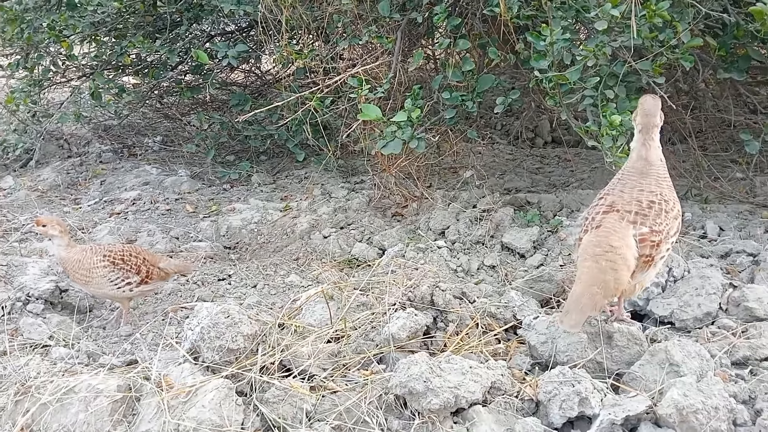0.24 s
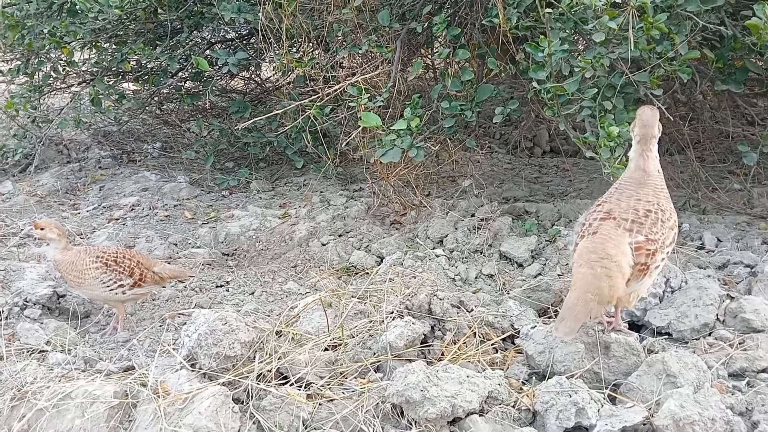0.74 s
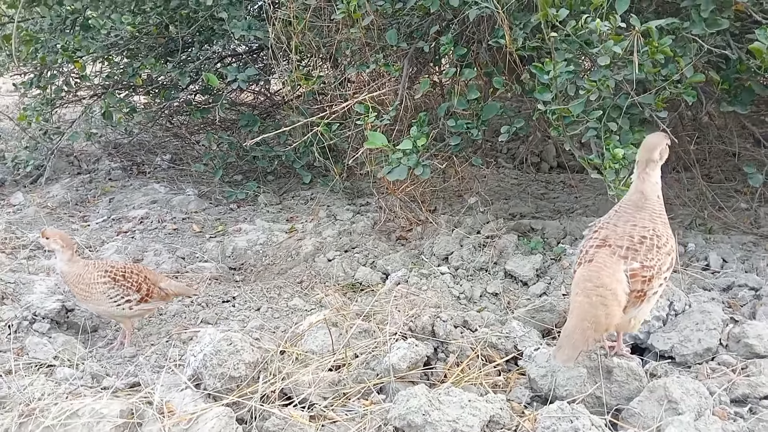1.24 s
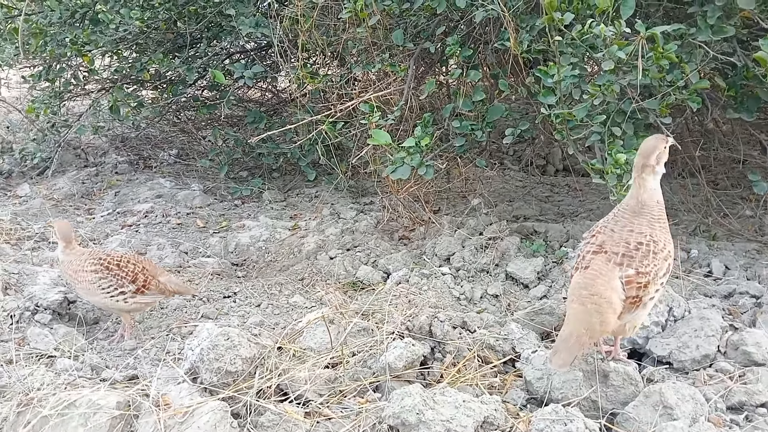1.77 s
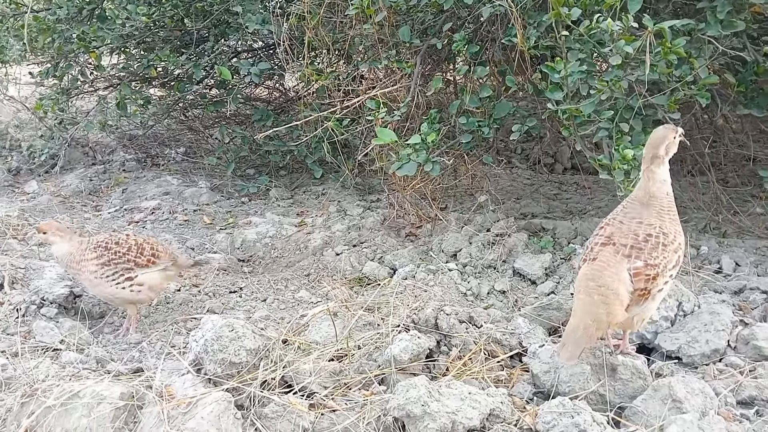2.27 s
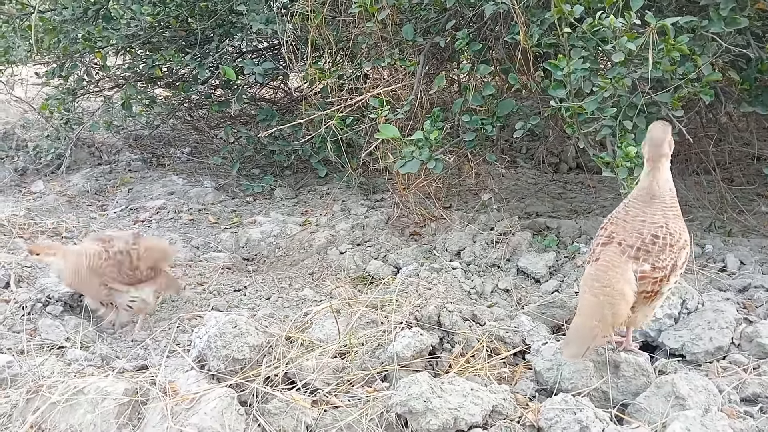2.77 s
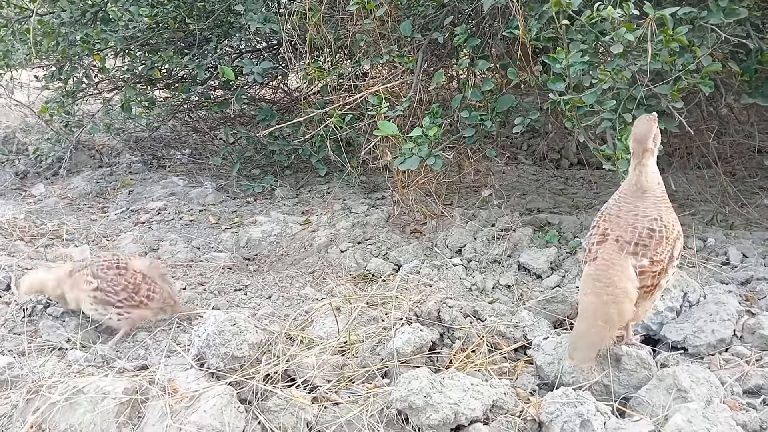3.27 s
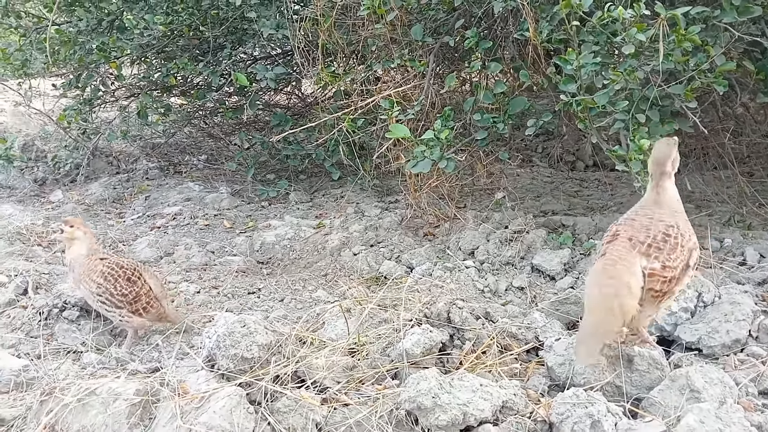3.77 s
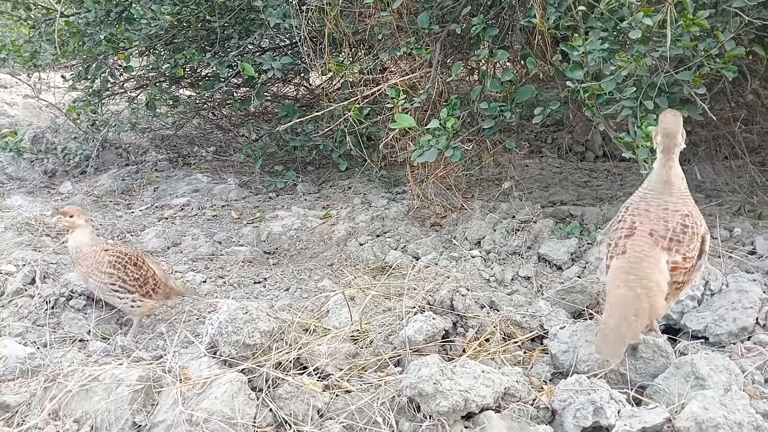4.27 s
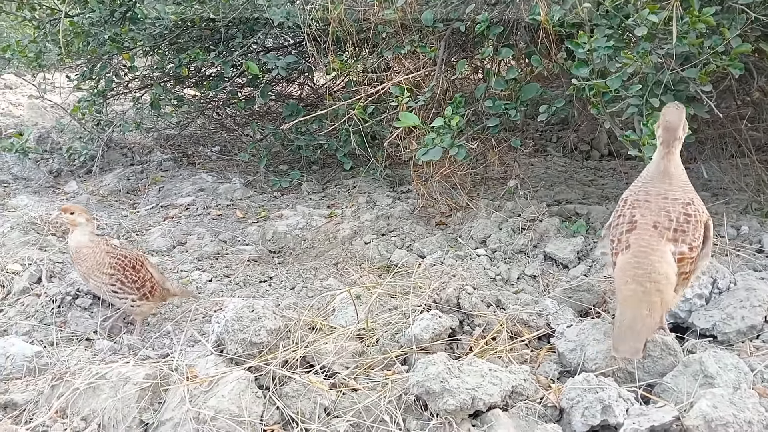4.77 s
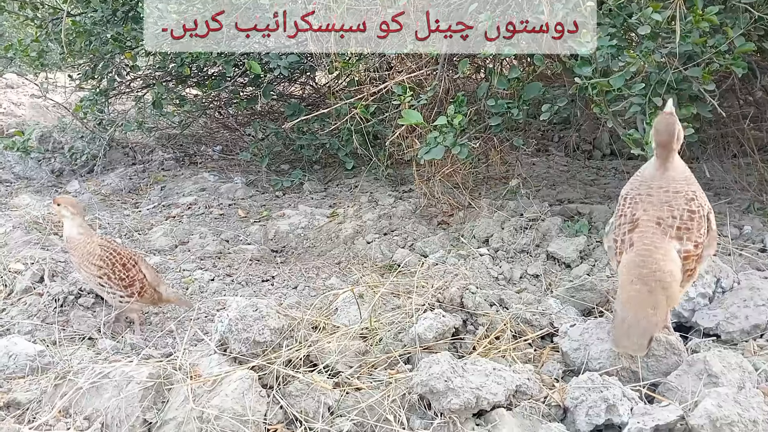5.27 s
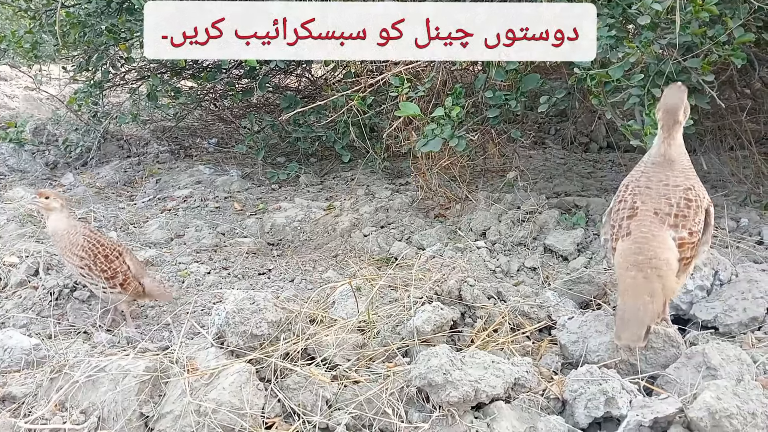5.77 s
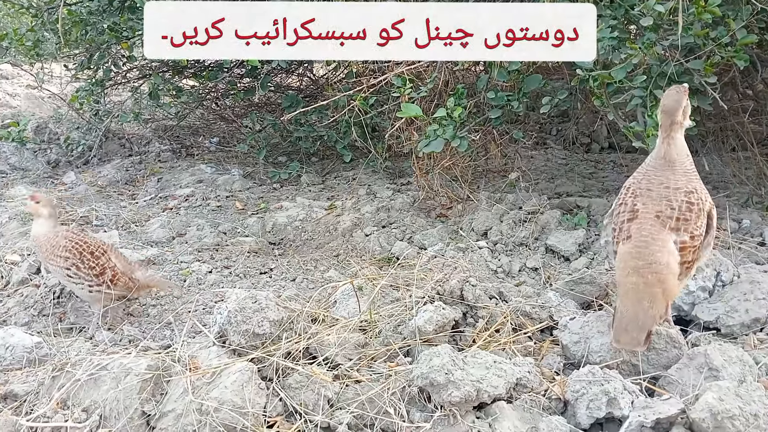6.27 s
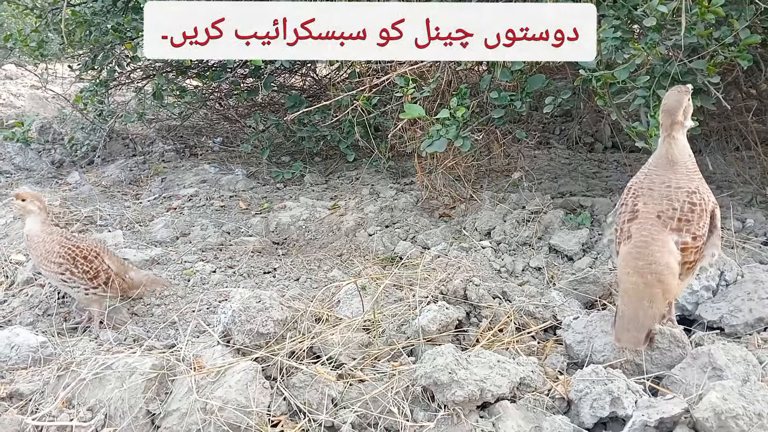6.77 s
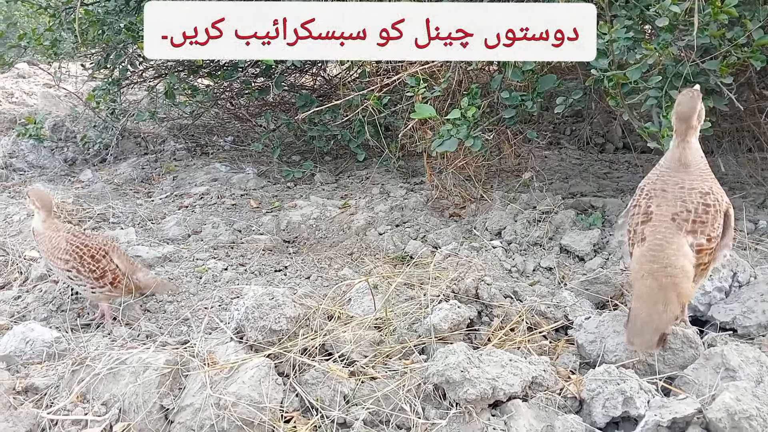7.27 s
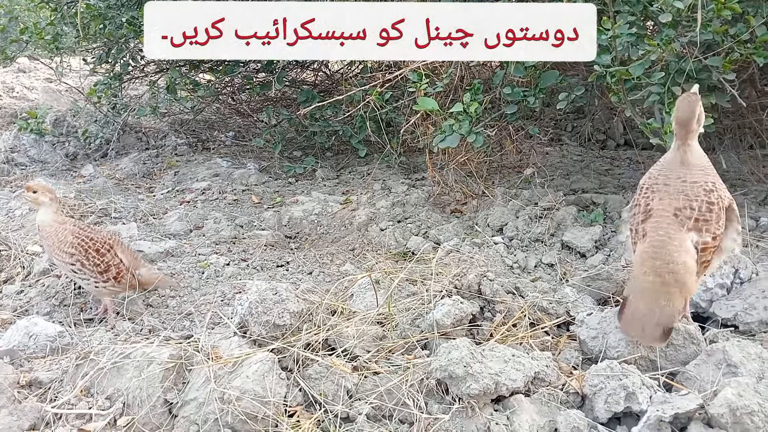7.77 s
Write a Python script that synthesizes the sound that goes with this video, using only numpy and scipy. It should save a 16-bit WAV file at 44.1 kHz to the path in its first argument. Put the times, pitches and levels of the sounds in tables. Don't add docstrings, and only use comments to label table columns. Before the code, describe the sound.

After a quiet windy lull, a close partridge gives one opening note, then harsh two-part screeches, clucks and whistles in steady repetition outdoors.

```python
import sys
import numpy as np
from scipy import signal
from scipy.fft import rfft, irfft
from scipy.io import wavfile
from scipy.ndimage import uniform_filter1d

SR = 44100
rng = np.random.default_rng(int(sys.argv[2]) if len(sys.argv) > 2 else 0)


def unload_wav(signal):
    wavfile.write(
        sys.argv[1],
        SR,
        np.round(np.clip(np.atleast_2d(signal).T, -1, 1) * 32767).astype(np.int16),
    )


def voltage_ratio(level):
    return 10 ** (np.asarray(level, float) / 20)


N = 353682

# start, level tone onset and falling tone onset in seconds, pitch in Hz, half-pitch in dB.
SCREECHES = [(2.387, 2.425, 2.494, 2083, 9), (2.966, 3.004, 3.070, 2087, 7.5),
             (3.569, 3.604, 3.674, 2103, 5.5), (3.941, 3.983, 4.044, 2141, 2.5),
             (4.618, 4.658, 4.721, 2110, 2.5), (5.309, 5.346, 5.415, 2103, 3),
             (5.908, 5.945, 6.012, 2106, 4.5), (6.506, 6.549, 6.616, 2088, 3),
             (7.12, 7.159, 7.229, 2093, 5), (7.726, 7.765, 7.833, 2087, 5)]
# head turn 0-1, half-pitch delay in seconds, falling half-pitch in dB, effort in dB.
SCREECH_MANNERS = [(.1, 0.011, -6.5, -0.1), (.1, 0.00064, -8.5, -0.5), (.1, 0.00089, -8, 1),
                   (.2, 0.0011, -8.5, -1), (.8, 0.0061, -7.5, 1), (.9, 0.0015, -7.5, .5),
                   (.9, .016, -8.5, 0), (.95, .001, -6, -0.1), (.9, 0.00065, -15.5, -1),
                   (.95, .001, -8.5, -.5)]
# start and tone onset in seconds, rasp in dB, tone in dB, pitch in Hz.
FULL_CLUCKS = [(2.653, 2.686, -17.5, -16.5, 1515), (2.772, 2.798, -19.5, -17, 1455),
               (3.24, 3.268, -16.5, -15, 1640), (3.356, 3.384, -15.5, -10, 1580),
               (4.204, 4.231, -14.5, -13.5, 1660), (4.322, 4.349, -14.5, -10.5, 1585),
               (4.897, 4.932, -14, -13.5, 1596), (5.018, 5.042, -16, -11.5, 1534),
               (5.595, 5.625, -16, -17, 1582), (6.189, 6.215, -14.5, -15.5, 1591),
               (6.79, 6.822, -15.5, -14, 1577), (7.402, 7.43, -15, -14, 1576),
               (8.006, 8.034, -18, -15, 1520)]
# start and tone onset in seconds, rasp and tone in dB, pitch in Hz.
CUT_CLUCKS = [(3.482, 3.509, -16, -25, 1612), (4.446, 4.471, -18.5, -15, 1483),
              (5.138, 5.17, -22, -19, 1410), (5.711, 5.739, -22, -17.5, 1494),
              (6.309, 6.337, -16.5, -13, 1474), (6.911, 6.942, -19, -13.5, 1465),
              (7.521, 7.551, -20, -15, 1452)]
# start and tone onset in seconds, rasp in dB, tone in dB, pitch in Hz.
OPENING_CALL = (1.581, 1.610, -20.5, -7.5, 1731)
# squeak start, tone on and tone off in seconds, pitch in Hz, mid-tone effort in dB.
WHISTLES = [
    (4.468, 4.506, 4.587, 2474, -4.5),
    (5.172, 5.21, 5.285, 2488, -5.5),
    (5.734, 5.772, 5.848, 2473, -6),
    (6.358, 6.395, 6.469, 2496, -11),
    (6.966, 7.003, 7.076, 2466, -19),
    (7.551, 7.592, 7.667, 2469, -18.5),
]
# effort in dB, pitch in Hz.
WHISTLE_SQUEAKS = [(2, 2470), (2, 2470), (0.5, 2470), (2.5, 2470), (2.5, 2470), (-0.5, 2470)]
# start and end in seconds, pitch in Hz, end pitch factor, level in dB.
CHUCKLES = [
    (1.703, 1.748, 635, 0.19, -26),
    (1.803, 1.845, 524, 0.32, -29),
]
HICCUPS = [
    (2.894, 2.917, 1090, 0.72, -28.5),
]
MURMURS = [
    (1.537, 1.572, 526, 0.71, -49.5),
]

# share of the part 0-1, pitch factor, level in dB, half-pitch in dB, roughness 0-1.
SCREECH_RASP = [(0, .36, -12, -1, .38), (0.199, .45, -1, -5, .4), (.4, .51, 2.5, -13.5, .28),
                (0.679, .5, -4, -24, .38), (.78, 1.4, -9.5, 3, .2), (.86, 1.44, -4.5, 14, .15),
                (1, 1.2, 6.5, -41, .25)]
SCREECH_LEVEL = [(0, 1.08, 2, -28, 0.12), (.07, 1.02, 3, -22.5, .007), (.28, 1.003, 1.5, -1, .005),
                 (.9, .992, -2, -5.5, .01), (1, .92, 0.5, 5, .15)]
SCREECH_BREAK = [(0, .8, 8, -14, 0.22), (0.303, 0.54, -5.5, -30, 0.25), (0.7, .51, 5, -11, .22),
                 (1, 0.78, 8.5, -10.5, 0.34)]
SCREECH_FALL = [(0, 1, 1, -42, 0.01), (0.198, 0.97, 1, -9, 0.0044), (0.419, .93, -2, 0, 0.03),
                (.62, .85, -12, 4.5, 0.038), (.85, .76, -15, -8, .05), (0.999, 0.72, -18, 0, 0.87)]
CLUCK_RASP = [(0, .3, -19, -19, 0.13), (0.352, .42, -6, -26.5, 0.13), (0.803, .62, 5, -20.5, .4),
              (1, 0.789, 11.5, -16.5, 0.48)]
CLUCK_TONE = [(0, 1.17, -14.5, -30.5, 0.089), (0.201, 1.08, 2, -32, 0.053), (0.451, .98, 7.5, -30.5, 0.026),
              (.68, .87, -0.5, -13.5, .03), (1.003, 0.66, -28, 0.5, 0.75)]
CLUCK_HUSK = [(0, .74, -1.5, -9, 0.64), (.25, .7, 1, -19.5, .7), (.7, .6, -28.5, -9.5, .8),
              (1, 0.39, -22, -0.5, 0.85)]
CUT_CLUCK_TONE = [(0, 1.1, -4, -18, 0.28), (.2, 1.03, 4.5, -29, 0.092), (.5, .97, -1, -32, 0.16),
                  (.7, .9, -5, -8, .2), (1, .8, -7.5, -7.5, 0.39)]
OPENING_TONE = [(0, 1.01, -3, -3, .05), (.15, 1.0, 0, 0, .005), (.58, .99, -1, -1, .005),
                (.7, .95, -9, -20, .01), (.78, .9, -4, -30, .02), (.88, .82, -13, -20, .1),
                (1.1, .74, -30, -10, .3)]
WHISTLE_SQUEAK = [(0, .58, -7.5, 13, .45), (.14, .74, -5, -4.5, .35), (.27, .9, -1.5, -26.5, .07),
                  (.44, .74, 5.5, -49, 0.085), (.51, .6, -5.5, -15, .4), (0.661, .44, -4.5, -2, .3),
                  (.88, .45, -8.5, -29, .25), (1, .63, 17, -27.5, .6)]
WHISTLE_DYING = [(0, 0.96, 8.5, -34.5, 0.2), (0.2, .44, -5, -50, 0.2), (0.552, .41, -14, -44, .2),
                 (1, 0.12, -29.5, -20.5, 0.34)]
MUTTER_FALL = [(0, 1.0, -3, -40, .06), (.26, .48, -2, -40, .12), (.6, .34, 0, -40, .14),
               (1, .22, -4, -40, .2)]

# frequency in Hz, level in dB.
WIDE_BEAK = [(1050, -17), (2100, 6), (3150, -1.5), (4200, 8), (5250, -7), (6300, -17.5), (7350, -33.5),
             (8400, -14), (9450, -33.5), (10500, -33.5), (12600, -49), (15000, -27)]
TURNED_BEAK = [(1050, -16), (2100, 4), (3150, -5), (4200, 6.5), (5250, 0.5), (6300, -9), (7350, -35.5),
               (8400, -22.5), (9450, -22), (10500, -26), (12600, -55), (15000, -26.5)]
SLACK_BEAK = [(900, -11), (1550, 19.5), (2100, 2), (3200, 7), (4200, -1), (5300, 4.5), (6300, -18),
              (7300, -45.5), (8400, -22), (11000, -42), (15000, -31)]
HALF_OPEN_BEAK = [(860, -10), (1730, 4.5), (2600, -4.5), (4300, -9.5), (5200, -17), (7000, -33.5),
                  (15000, -59)]
NARROW_BEAK = [(1200, -19.5), (2500, 4), (5000, -3.5), (7500, -16), (10000, -19.5), (12400, -29),
               (15000, -27)]
TIGHT_BEAK = [(1500, 1.5), (2960, 1.5), (5920, -5), (8900, -30), (15000, -49)]
PINCHED_BEAK = [(500, -39), (1030, -5.5), (1500, -16), (2200, -9), (3000, -7), (3700, -1), (4300, -8),
                (5500, -16.5), (6800, -30.5), (10000, -33), (15000, -65)]
LOW_THROAT = [(800, -4), (1550, 11.5), (2300, -15.5), (3400, -6.5), (4500, -20), (5500, -16.5), (6600, -40),
              (9000, -62), (15000, -35)]
RASP_THROAT = [(300, -60), (600, -24), (1020, -7.5), (1450, -16), (2200, -1.5), (2700, 4.5), (3200, 4),
               (3700, -0.5), (4500, -1.5), (5800, -12), (6800, -55), (10000, -30), (14500, -64)]
CROAK_THROAT = [(300, -20.5), (500, -10.5), (750, -8.5), (1100, -9.5), (1600, 0), (2500, 1), (4300, -9.5),
                (5800, -15), (6800, -69), (12000, -60), (14500, -45)]
HOARSE_THROAT = [(400, 1), (900, -14), (1500, -1), (2300, 1), (3200, -5), (4300, -17), (6000, -19.5),
                 (7000, -61), (14500, -65)]
SOFT_THROAT = [(400, -9), (700, -6), (1100, 9.5), (1700, -4), (2150, -25), (2750, -13), (3400, -27),
               (4100, -25.5), (5000, -47), (9000, -122)]
PURE_TONE = [(500, 0), (700, -1), (15000, -140)]
# frequency in Hz, level in dB.
BREATH = [(500, -16.5), (1300, -23), (2400, 0), (6000, 13.5), (15400, 9.5), (15900, -48)]
# frequency in Hz, gain in dB.
LOW_CUT = [(150, -23.5), (300, -10), (450, -1), (15500, -0.5), (16000, -37)]

# delay in seconds, level in dB.
ECHOES = [
    (.175, -51.5),
    (.335, -54),
    (0.449, -27),
    (0.569, -14),
]
# frequency in Hz, T60 in seconds.
TREE_DECAY = [(500, 0.49), (1500, 0.68), (3000, 0.64), (5500, 0.56), (7000, 0.92), (8500, 0.55),
              (12000, 0.12)]
# frequency in Hz, bandwidth in Hz, level in dB, T60 in seconds.
LAST_CALL = [(1760, 49, -50.5, 0.48), (3600, 51, -69, 0.59), (5335, 120, -63, 0.374),
             (1410, 180, -62, 0.34)]

# start in seconds, level in dB.
RIVAL = [(2.735, -52), (2.83, -50), (4.39, -51), (4.815, -50), (4.845, -47), (5.07, -48), (5.855, -46),
         (6.725, -46), (6.85, -47), (7.67, -44)]
# start and end in seconds, pitch in Hz, end pitch factor, level in dB.
FAR_PIPES = [
    (1.455, 1.56, 3230, .72, -63),
    (1.75, 1.82, 3200, .98, -57),
    (2.04, 2.155, 3110, .74, -64),
]
FAR_SLURS = [(.66, 1.02, 2250, .87, -61), (.69, 1.08, 2290, .84, -63), (1.88, 2.09, 2240, .92, -60),
             (.425, .452, 3250, 1.25, -62), (.442, .475, 4080, .99, -60), (.46, .57, 3950, .96, -67),
             (.95, 1.05, 1680, .98, -65), (1.22, 1.3, 4600, .99, -70), (1.33, 1.4, 4450, .98, -70)]
FAR_COOS = [(.05, .5, 810, .99, -66), (.65, .86, 820, .99, -66), (.85, 1.15, 640, .99, -65),
            (.5, 1.2, 3790, .985, -71), (.48, 1.24, 1520, .99, -69)]

# frequency in Hz, density in dB per Hz.
AIR = [(150, -3.5), (300, -6), (793, -7.5), (1010, -14), (1340, -6.5), (3200, -18.5), (3770, -15),
       (4940, -27.5), (9000, -43), (12500, -60), (15500, -54), (16000, -94)]
# frequency in Hz, density in dB per Hz.
WIND = [(20, -40.5), (32, -22), (56, -1.5), (102, 1.5), (173, -11), (248, -18.5), (400, -34), (600, -79)]
# peak time in seconds, level in dB, half width in seconds.
GUSTS = [(.13, -52, 0.052), (.42, -47, 0.087), (.78, -39, 0.16), (1.06, -46.5, 0.08), (1.28, -55, 0.068),
         (1.5, -54, 0.089), (2.1, -58, 0.27), (2.7, -53, 0.082), (2.88, -47.5, 0.08), (3.45, -45, 0.079),
         (3.65, -57, 0.064), (3.899, -51.5, 0.13), (4.35, -54, 0.24), (4.999, -55, 0.17),
         (5.75, -54, 0.092), (6.05, -60, 0.15), (6.34, -45.5, 0.12), (6.93, -49, 0.15), (7.35, -72, 0.038),
         (7.52, -48, 0.17), (7.72, -55, 0.089)]
# start in seconds, length in seconds, level in dB, colour as (Hz, dB) pairs.
RUSTLES = [
    (1.18, .34, -72, [(2500, -8), (4500, -5), (6000, -10), (7500, 0), (10000, -14), (16000, -40)]),
    (2.6, .36, -53, [(120, -20), (300, 0), (1100, -8), (4000, -55)]),
]
# time in seconds, peak in dB.
TICKS = [
    (2.0685, -11),
    (2.769, -25),
    (2.891, -24),
]


def bird():
    parts = []
    for row, manner in zip(SCREECHES, SCREECH_MANNERS):
        parts += screech(*row, *manner)
    for start_s, on_s, *rest in FULL_CLUCKS:
        parts += cluck(start_s, on_s, start_s + 0.063, *rest, CLUCK_TONE, LOW_THROAT)
    for start_s, on_s, *rest in CUT_CLUCKS:
        parts += cluck(start_s, on_s - 0.005, on_s + 0.03, *rest, CUT_CLUCK_TONE, LOW_THROAT)
    start_s, on_s, *rest = OPENING_CALL
    parts += cluck(start_s, on_s, start_s + 0.096, *rest, OPENING_TONE, HALF_OPEN_BEAK, HOARSE_THROAT)
    for row, squeak in zip(WHISTLES, WHISTLE_SQUEAKS):
        parts += whistle(*row, *squeak)
    parts += cracked_whistle()
    loud = np.zeros(N)
    for part in parts:
        add(loud, *part)
    return coloured(loud, LOW_CUT) + soft_notes()


def screech(start_s, on_s, fall_s, hz, half_db, turned, late_s, fall_half_db, effort_db):
    turned = np.clip(turned, 0, 1)
    beak = [(f, wide_db + turned * (read(TURNED_BEAK, f) - wide_db)) for f, wide_db in WIDE_BEAK]
    on_late_s = on_s + 0.003
    off_s = fall_s - 0.0195
    end_s = fall_s + 0.063 + 0.01 * (start_s > 4.4)
    return [voice(start_s, on_late_s, SCREECH_RASP, hz, -11 + effort_db, RASP_THROAT, spread=0.39),
            voice(on_late_s, off_s, SCREECH_LEVEL, hz, -6.5 + effort_db, beak, half_db, late_s + 0.002),
            voice(off_s, fall_s, SCREECH_BREAK, hz, -15.5, RASP_THROAT),
            voice(fall_s, end_s, SCREECH_FALL, hz, -8.5 + effort_db, SLACK_BEAK, fall_half_db)]


def cluck(start_s, on_s, end_s, rasp_db, tone_db, hz, shape, throat, croak=CROAK_THROAT):
    rasp_hz, spread = 1580, 0.13
    return [voice(start_s, on_s, CLUCK_RASP, rasp_hz, rasp_db, croak, spread=spread),
            voice(on_s - 0.003, end_s, shape, hz, tone_db, throat),
            voice(on_s, on_s + 0.042, CLUCK_HUSK, rasp_hz, rasp_db - 4.5, croak, spread=spread)]


def whistle(start_s, on_s, off_s, hz, db, squeak_db, squeak_hz):
    return [voice(start_s, on_s, WHISTLE_SQUEAK, squeak_hz, -12.5 + squeak_db, PINCHED_BEAK),
            held_tone(on_s, off_s, hz, -7.5, db, -13 + 0.06 * db, -54 - 1.1 * db),
            voice(off_s + 0.00089, off_s + 0.032, WHISTLE_DYING, 2470, -18 - 0.24 * db, PINCHED_BEAK)]


def cracked_whistle():
    start_s, on_s, jump_s, off_s = 3.782, 3.817, 3.846, 3.892
    low_hz, high_hz = 2458, 2972
    low_db, high_db = -9, -8
    return [voice(start_s, on_s, WHISTLE_SQUEAK, 2470, -18, PINCHED_BEAK),
            held_tone(on_s, jump_s, low_hz, low_db - 4.5, low_db, low_db, -54),
            held_tone(jump_s, off_s, high_hz, high_db, high_db, high_db, -40, -0.3, TIGHT_BEAK),
            voice(off_s, off_s + 0.032, WHISTLE_DYING, 2400, -18, PINCHED_BEAK)]


def held_tone(on_s, off_s, hz, early_db, middle_db, late_db, half_db, sharp=0.93, throat=NARROW_BEAK):
    shape = [(0, 1 + 0.04 * sharp, early_db - 3, 45, 0.069),
             (0.15, 1 + 0.016 * sharp, early_db, -26, 0.013),
             (0.4, 1.002, middle_db, 18.5, 0.0048),
             (0.94, 0.988, late_db, -12, 0.005),
             (1, 0.95, late_db - 6, 6, 0.1)]
    return voice(on_s, off_s, shape, hz, 0, throat, half_db, tilt_db=(1.5, 0))


def soft_notes():
    out = notes(CHUCKLES, SOFT_THROAT, 0.13, 0.72, 0.7)
    out += notes(HICCUPS, CROAK_THROAT, 0.3)
    out += notes(MURMURS, SOFT_THROAT, 0.1, 1.0, 0.1)
    add(out, *voice(2.12, 2.275, MUTTER_FALL, 1510, -48.5, SOFT_THROAT))
    return out


def notes(rows, throat, rough, rise=0.94, hold=0.5):
    out = np.zeros(N)
    for start_s, end_s, hz, bend, db in rows:
        arch = [(0, rise, -8, -40, rough),
                (hold / 2, 1.0, 0, -40, rough),
                (hold, 0.9 + 0.1 * bend, -1, -40, rough),
                (1, bend, -8, -40, rough)]
        add(out, *voice(start_s, end_s, arch, hz, db, throat, -40))
    return out


def voice(start_s, end_s, shape, hz, db, throat, half_db=0., late_s=0., tilt_db=(0, 0), spread=1):
    count = round((end_s - start_s + 0.004) * SR)
    t = np.arange(count) / SR
    share, *columns = np.transpose(shape)
    pitch, level_db, odd_db, rough = (np.interp(np.linspace(0, 1, count), share, c) for c in columns)
    rough = np.clip(rough, 0, 1)
    wobble, flutter, air = rng.standard_normal((3, count))

    jitter = np.tanh(evened(uniform_filter1d(wobble, size=40)))
    f = hz * pitch * (1 + 0.394 * rough * jitter)
    turns = np.cumsum(f / 2) / SR + rng.random()
    k = np.arange(1, 1 + int(31000 / max(hz * pitch.min(), 700)))[:, None]
    partial_hz = k * f / 2

    held_db = 22 * np.clip((late_s - t) / 0.0073 + 1, 0, 1) * (late_s > 0)
    lines_db = read(throat, k * hz * pitch / 2) + (k % 2) * (odd_db + half_db - held_db)
    lines_db += np.linspace(*tilt_db, count) * np.log2(k / 2)
    lines = voltage_ratio(lines_db - 99 * (partial_hz > 15800))

    speed, phase = rng.random((2, len(k), 1))
    lines = lines * voltage_ratio(2.0 * np.sin(2 * np.pi * (30 * speed * t + phase)))
    grain = evened(uniform_filter1d(rng.standard_normal(lines.shape), size=40, axis=1))
    lines = lines * (1 + 0.3 * (partial_hz / 15000) ** 2 * grain)

    ringing = spread * np.pi / 8 * k ** 2
    tone = (lines * np.cos(2 * np.pi * k * turns + ringing)).sum(0)
    tone /= np.sqrt((lines ** 2).sum(0) / 2)
    tone *= voltage_ratio(2.0 * rough * evened(uniform_filter1d(flutter, size=50)))

    puffs = (0.078 + np.exp(-(2 * turns % 1) / 0.29)) * air
    puffs = evened(coloured(coloured(puffs, throat), BREATH))
    mix = np.sqrt(1 - rough ** 2) * tone + 0.75 * rough * puffs
    edges = signal.windows.tukey(count, min(0.0075 * SR / count, 1))
    return start_s - 0.002, voltage_ratio(db + level_db) * mix * edges


def trees(x):
    t = np.arange(2 * SR) / SR
    shape = voltage_ratio(-11.5) * np.exp(-t / 0.0063)
    shape += voltage_ratio(-48.0) * np.minimum(t / 0.021, 1)
    for delay_s, db in ECHOES:
        shape += voltage_ratio(db) * np.exp(-((t - delay_s) / 0.0063) ** 2)
    hz, frame_s, z = signal.stft(shape * rng.standard_normal(len(t)) / 8, SR, nperseg=256)
    decay = voltage_ratio(-60 * frame_s / read(TREE_DECAY, hz)[:, None])
    tail = signal.istft(z * decay, SR, nperseg=256)[1]
    return signal.fftconvolve(x, tail)[:N]


def far_birds():
    rival = [(s, s + 0.068, 2475 + 200 * (s < 3), 0.98, db) for s, db in RIVAL]
    out = notes(FAR_PIPES, PURE_TONE, 0.02, 0.96, 0.72)
    out += notes(FAR_SLURS, PURE_TONE, 0.3, 1.0, 0.1)
    out += notes(FAR_COOS, PURE_TONE, 0.16, 1.0)
    out += notes(rival, PURE_TONE, 0.09, 1.01)
    return out


def background():
    return open_air() + wind() + earlier_echo() + rustles() + pebbles()


def open_air():
    hiss = evened(coloured(rng.standard_normal(N), AIR))
    _, _, z = signal.stft(hiss, SR, nperseg=1024)
    patches = uniform_filter1d(rng.standard_normal(z.shape), size=5, axis=0)
    patches = evened(uniform_filter1d(patches, size=8, axis=1))
    return voltage_ratio(-61.5) * signal.istft(z * voltage_ratio(2.3 * patches), SR, nperseg=1024)[1][:N]


def wind():
    t = np.arange(N) / SR
    lumps = voltage_ratio(2.0 * evened(uniform_filter1d(rng.standard_normal(N), size=1500)))
    strength = voltage_ratio(-59.5) + sum(voltage_ratio(db) * np.exp(-((t - s) / half_s) ** 2) for s, db, half_s in GUSTS)
    return strength * evened(coloured(lumps * rng.standard_normal(N), WIND))


def earlier_echo():
    out = np.zeros(N)
    t = np.arange(SR) / SR
    for hz, width_hz, db, t60_s in LAST_CALL:
        slow = uniform_filter1d(rng.standard_normal((2, SR)), int(SR / width_hz), axis=1)
        turn = 2 * np.pi * hz * t
        band = evened(slow[0] * np.cos(turn) + slow[1] * np.sin(turn))
        out[:SR] += voltage_ratio(db - 60 * t / t60_s) * band
    return out


def rustles():
    out = np.zeros(N)
    for start_s, length_s, db, colour in RUSTLES:
        noise = evened(coloured(rng.standard_normal(round(length_s * SR)), colour))
        add(out, start_s, voltage_ratio(db) * noise * signal.windows.tukey(len(noise), 0.5))
    return out


def pebbles():
    out = np.zeros(N)
    t = np.arange(200) / SR
    for s, db in TICKS:
        add(out, s, voltage_ratio(db - 11.0) * np.exp(-t / 0.00015) * np.cos(2 * np.pi * 2500 * t))
    return out


def evened(x):
    return x / np.sqrt(np.mean(x ** 2) + 1e-20)


def read(points, hz):
    f, value = np.transpose(points)
    return np.interp(np.log(hz + 1), np.log(f + 1), value)


def coloured(x, points):
    gain = voltage_ratio(read(points, np.fft.rfftfreq(len(x), 1 / SR)))
    return irfft(rfft(x) * gain, len(x))


def add(mix, start_s, sound):
    part = mix[round(start_s * SR):][:len(sound)]
    part += sound[:len(part)]


def scene():
    near = bird()
    return (near + trees(near) + far_birds() + background())[None]


def roll_off(x):
    return signal.sosfilt(signal.butter(12, 16090, fs=SR, output="sos"), x)


def record(dry):
    power_db = 10 * np.log10(abs(uniform_filter1d(dry[0] ** 2, size=800)) + 1e-12)
    over_db = uniform_filter1d(np.maximum(power_db + 18.0, 0), size=800)
    mix = np.clip(dry * voltage_ratio(2.5 - 0.38 * over_db), -0.98, 0.98)
    return roll_off(mix)


dry = scene()
out = record(dry)
unload_wav(out)
```